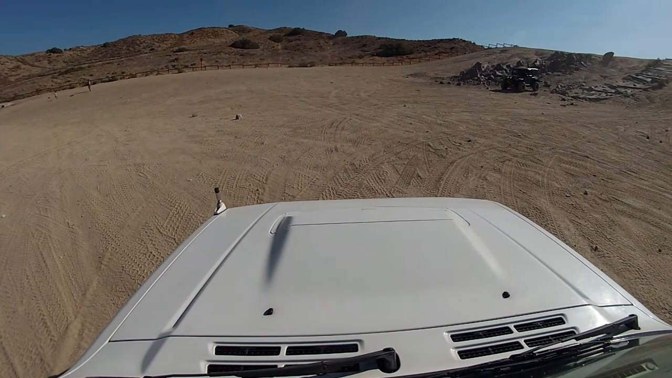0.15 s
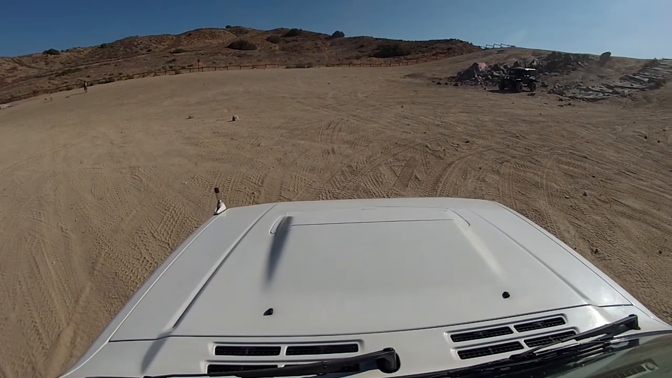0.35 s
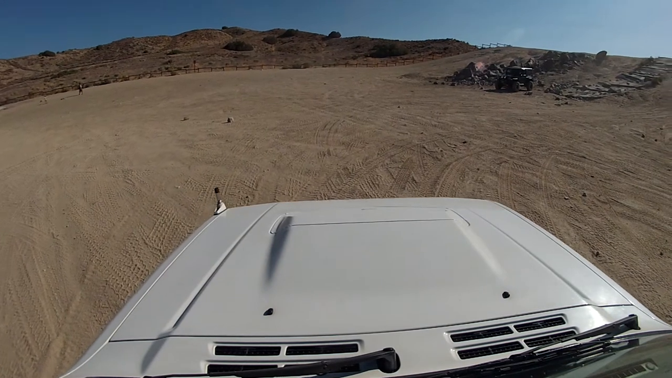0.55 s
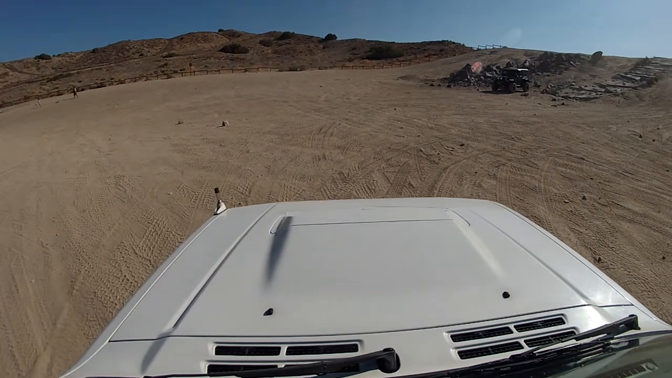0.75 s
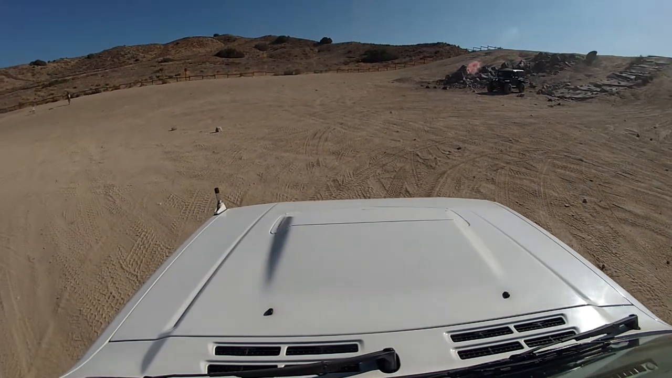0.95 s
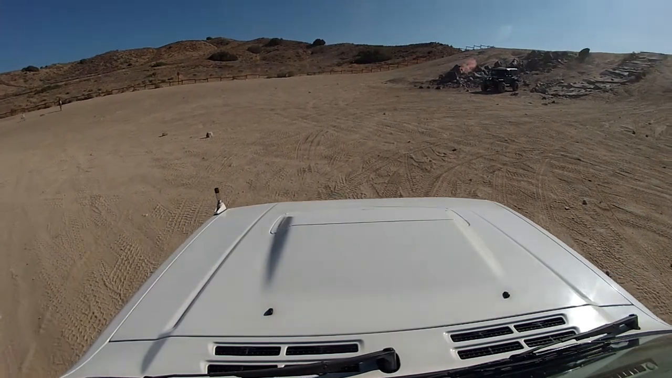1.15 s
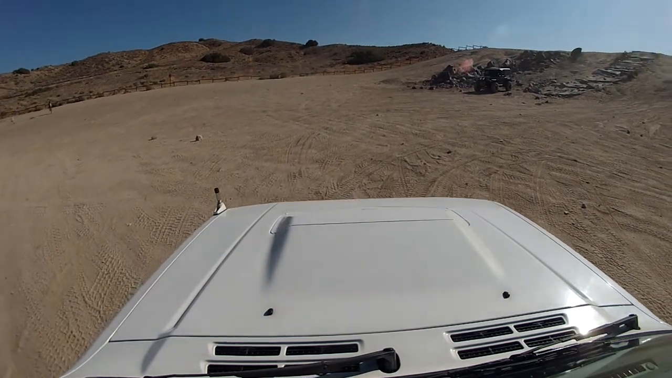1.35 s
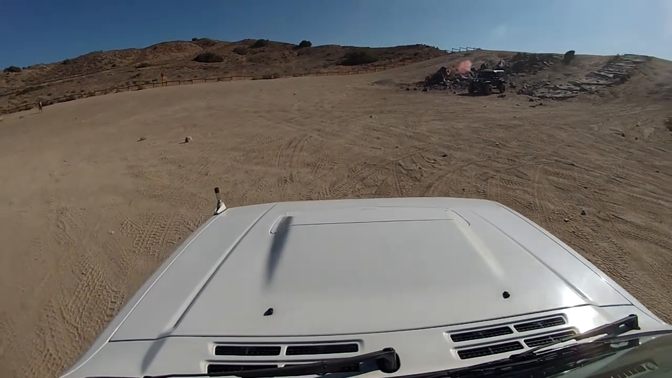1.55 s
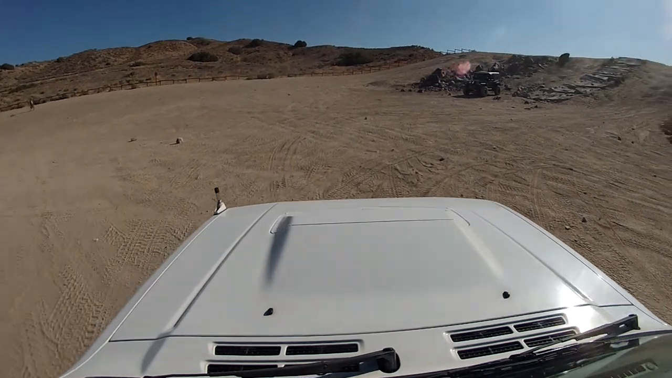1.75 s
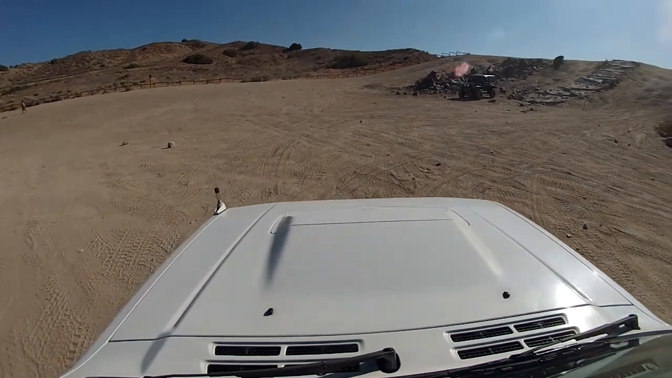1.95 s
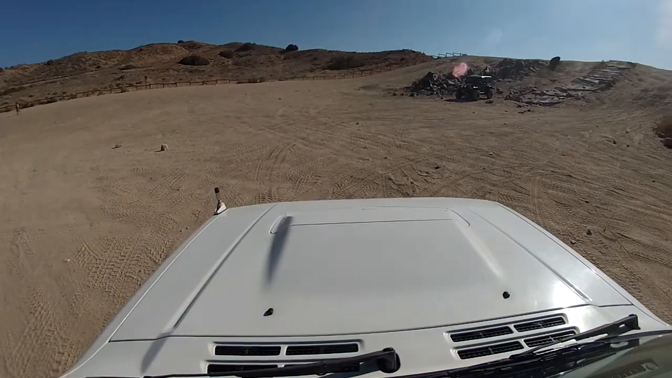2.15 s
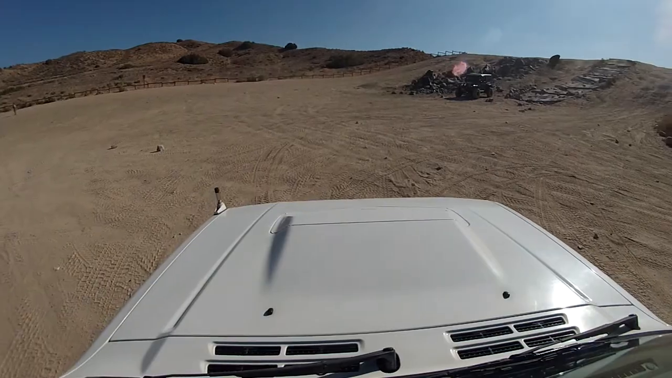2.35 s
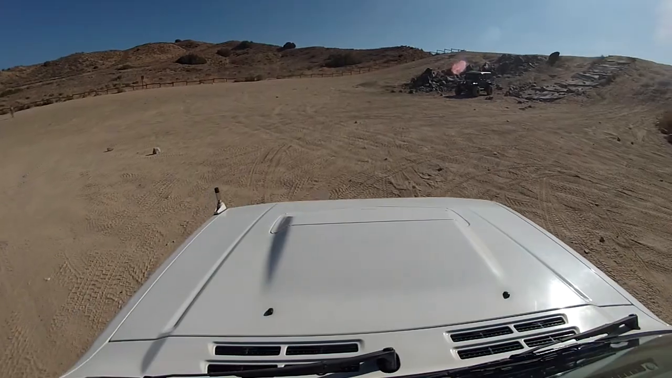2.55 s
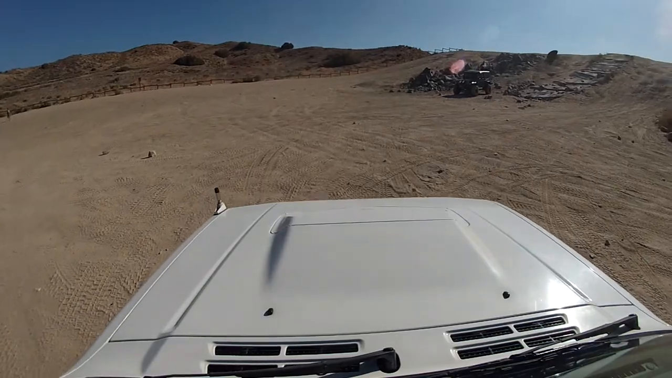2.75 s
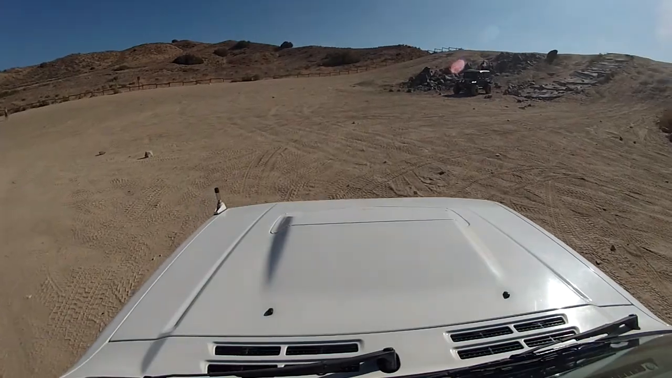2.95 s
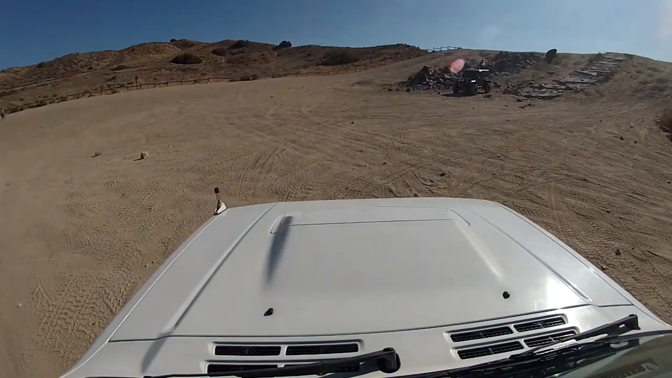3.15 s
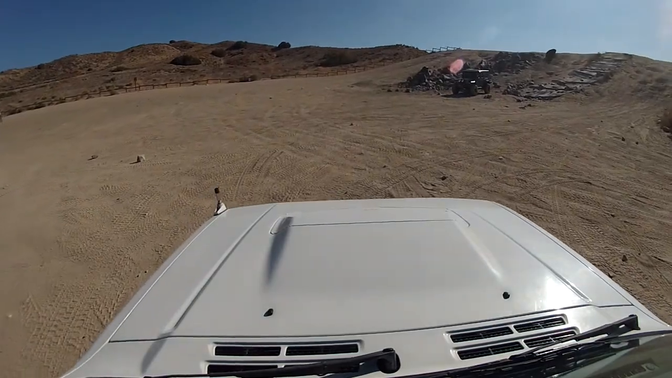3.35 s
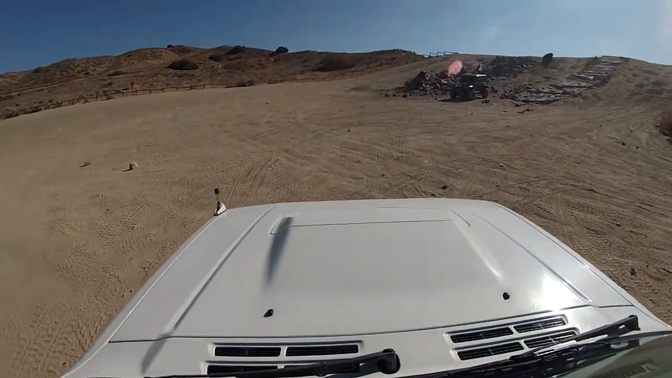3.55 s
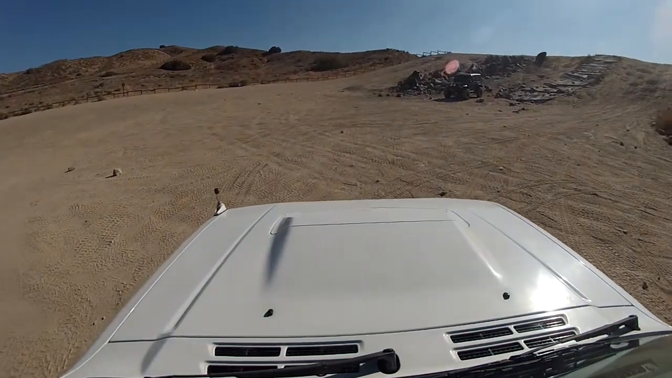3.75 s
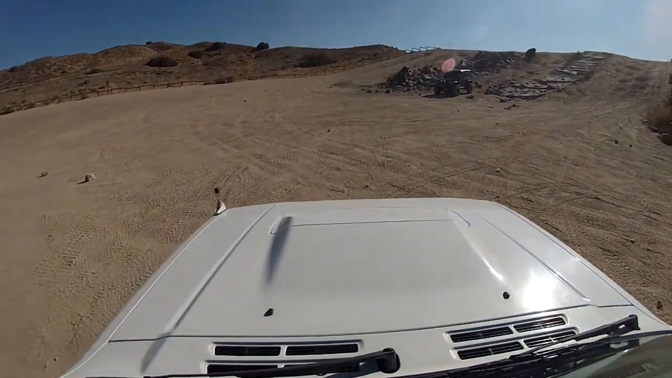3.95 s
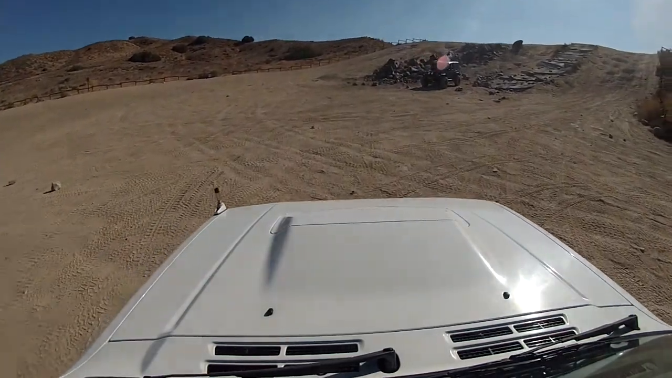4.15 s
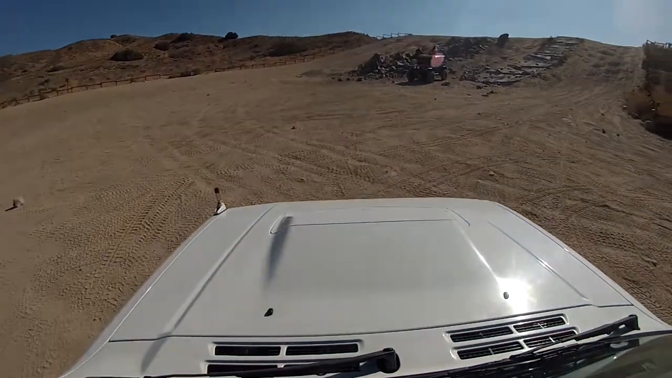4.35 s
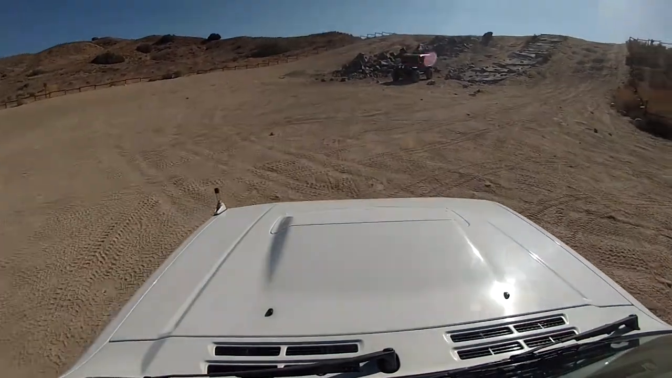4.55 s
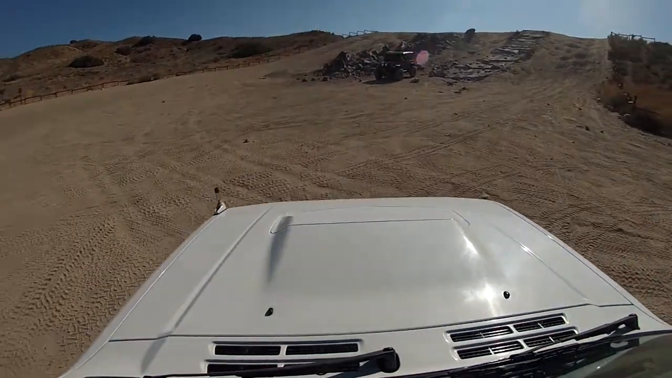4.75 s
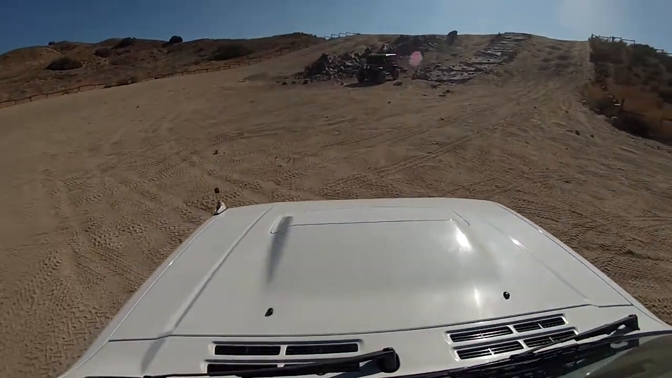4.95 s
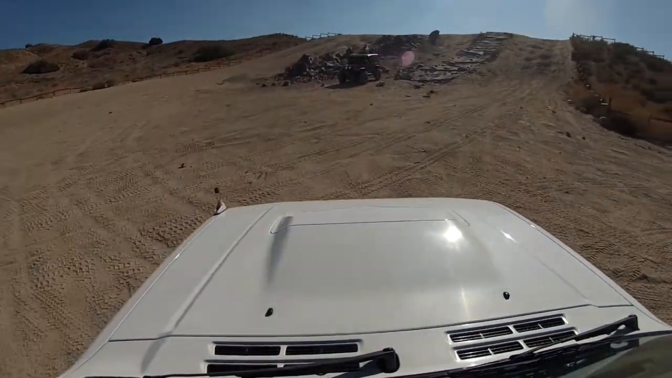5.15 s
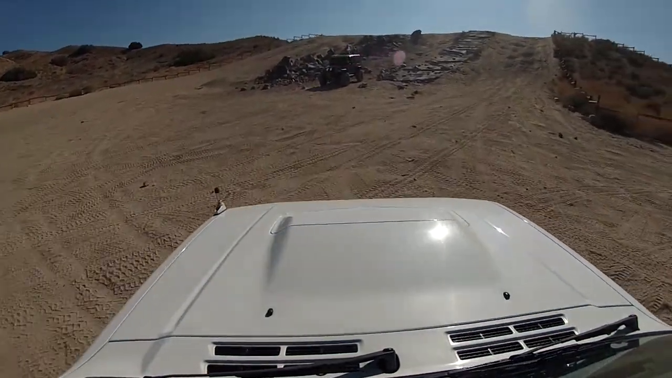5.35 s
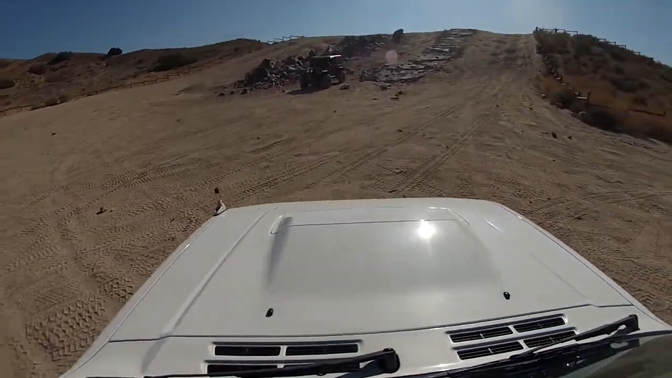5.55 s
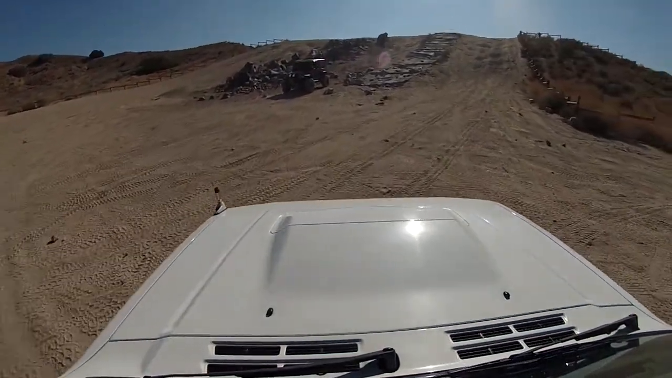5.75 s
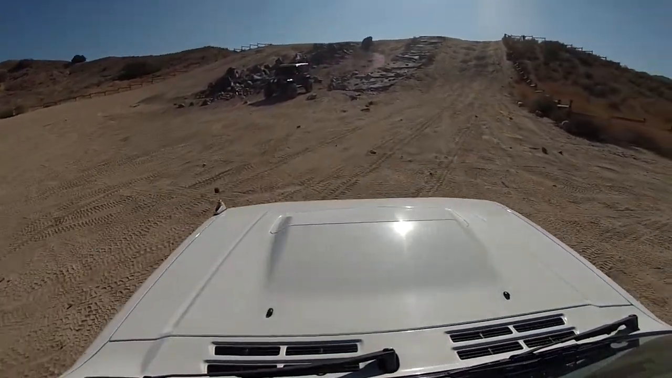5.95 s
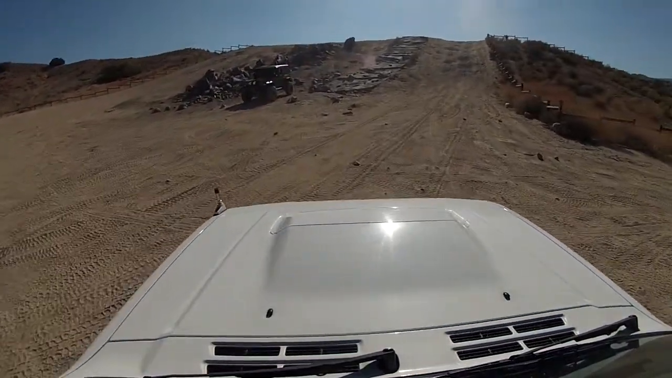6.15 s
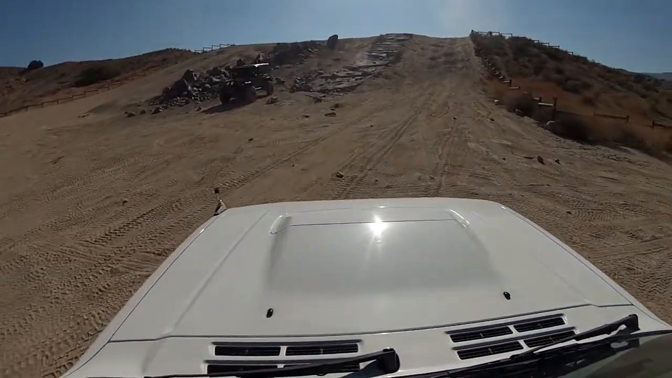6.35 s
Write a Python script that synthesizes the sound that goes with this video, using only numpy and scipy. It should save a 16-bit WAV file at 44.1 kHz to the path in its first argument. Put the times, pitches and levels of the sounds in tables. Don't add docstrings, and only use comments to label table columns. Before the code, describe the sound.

Heard from a muffled microphone in a housing on a truck's roof outdoors: a low engine throb over wind and tyre rumble, with a brief early rev and a faint trim squeak. It slows, lugs and shakes over bumps, then pulls hard up the sandy slope, revs climbing into a loud roar with fan whine, a grit tick and a thin belt squeal, then drops for a gear change.

```python
import sys
import numpy as np
from scipy import signal
from scipy.io import wavfile
from scipy.ndimage import uniform_filter1d

SR = 44100
rng = np.random.default_rng(int(sys.argv[2]) if len(sys.argv) > 2 else 0)


def nominal_scale(level):
    x = np.asarray(level, float) / 20
    return 10 ** x


def dump(signal):
    limited = np.clip(np.atleast_2d(signal).T, -1, 1)
    pcm = np.round(limited * 32767).astype(np.int16)
    wavfile.write(sys.argv[1], SR, pcm)


N = 282681

# time in seconds, shaft speed in Hz (turns per second).
SHAFT_SPEED = [(0, 16.5), (.55, 16.1), (.87, 23.1), (1.04, 22.5), (1.3, 20), (1.9, 19.2), (2.5, 16.6),
               (3.18, 14.8), (3.32, 24), (3.55, 32), (3.78, 42.3), (4.02, 44.6), (4.42, 54), (4.75, 58),
               (5.42, 62.4), (5.86, 62.5), (6.19, 44.6), (6.41, 44.6)]
# time in seconds, level of its second order in dB.
EFFORT_LEVEL = [(0, -49.5), (.3, -38), (.6, -43.5), (.9, -28), (1.1, -35.5), (1.4, -44), (2.0, -44),
                (2.75, -52), (3.12, -38.5), (3.27, -25.5), (3.57, -17.5), (3.85, -23.5), (4.4, -27.5),
                (5.25, -25.5), (5.55, -23), (5.87, -24.5), (6, -32), (6.26, -25)]
# time in seconds, timing scatter in radians.
LUGGING = [
    (0, .12),
    (1.8, .15),
    (2.2, .5),
    (2.5, .9),
    (3.1, .9),
    (3.3, .2),
    (6.41, .2),
]
# multiple of the shaft speed, level in dB.
EVEN_ORDER_LEVELS = [(4, 0), (8, -7.5)]
# multiple of the shaft speed, level in dB.
OTHER_ORDER_LEVELS = [(1, -5), (5, 0), (6, -2.5), (7, -12)]
# frequency in Hz, level in dB.
THIRD_ORDER = [(45, -6), (66, -9), (95, -7), (120, -5), (135, -4), (146, -3), (153, -17), (190, -18)]
# frequency in Hz, level in dB.
CAB_BOOM = [(15, -6), (65, 0), (97, -4), (132, 3), (140, 1), (151, -13), (190, -13), (222, -3), (270, -4),
            (320, -17)]
# frequency in Hz, level in dB.
FAN_TONE = [(70, -62), (150, -45), (190, -36), (206, -34), (222, -40), (265, -33), (284, -34), (293, -39)]
# frequency in Hz, level in dB.
FAN_OCTAVE = [(140, -64), (300, -54), (420, -50), (480, -39), (540, -37), (586, -32)]
# frequency in Hz, level in dB per Hz.
SHUT_THROTTLE = [(50, -24.5), (140, -18.5), (165, -17.5), (300, -18), (400, -23), (950, -27.5),
                 (1300, -37.5), (2300, -44.5), (3600, -48), (3850, -51.5), (5900, -53), (6300, -53.5),
                 (9000, -60.5), (15000, -81)]
# frequency in Hz, level in dB per Hz.
OPEN_THROTTLE = [(50, -6.5), (140, -10.5), (165, -9.5), (300, -18), (400, -13.5), (950, -20), (1300, -33.5),
                 (2300, -38.5), (3600, -42.5), (3850, -47.5), (5900, -57.5), (6300, -59.5), (9000, -64),
                 (15000, -75)]
# frequency in Hz, width in Hz, boost in dB.
HOUSING_CAVITIES = [(267, 81, 3), (534, 100, 3), (720, 11, 9), (910, 137, 3.5), (1796, 390, 5),
                    (2875, 270, 5), (3197, 76, 6), (3450, 157, 8), (5440, 330, 6.5), (5780, 200, 8.5),
                    (4430, 120, 4), (9700, 200, 5.5), (10700, 120, 5)]
# frequency in Hz, level in dB per Hz.
RUMBLE_COLOUR = [(5, -15.5), (16, 8), (35, 19), (60, 14), (100, 8.5), (140, -21), (200, -42)]
# time in seconds, level in dB, frequency in Hz, length in cycles.
SPRING_JOLTS = [(.08, -31, 28, 1.5), (1.845, -23, 26, 1.2), (2.16, -22, 38, .9), (2.4, -31, 32, 1.2),
                (2.76, -29, 28, 1.5), (2.68, -30, 125, 3.5), (2.8, -28, 90, 2.5), (3.19, -29, 125, 3.5),
                (.77, -35, 205, 9), (4.29, -27, 30, 1.5), (6.25, -27, 30, 2.5), (5.15, -26, 58, 5.5),
                (5.27, -27, 80, 6.5), (5.7, -26, 55, 3.5)]
# start in seconds, length in seconds, pitch in Hz, sag in Hz per second, level in dB.
SQUEAL_EVENTS = [
    (3.9, .09, 8870, 300, -73),
    (3.985, .29, 8858, -40, -57),
    (4.28, .035, 8825, 600, -68),
    (4.32, .06, 8800, 1200, -72),
    (.35, .17, 1580, 900, -61),
]
# time in seconds, click level in dB, ring level in dB.
GRIT_TICKS = [
    (3.58, -50, -37),
    (3.591, -36, -44),
    (.62, -74, -61),
    (1, -72, -60),
    (1.06, -72, -61),
    (1.27, -74, -55),
    (3.334, -66, -54),
]

IDLE_HZ, LIGHT_DB = 16, -42


def evened(x):
    return x / np.sqrt(np.mean(x ** 2) + 1e-20)


def read(points, hz):
    f, value = np.transpose(points)
    return np.interp(np.log(hz + 1), np.log(f + 1), value)


def follow(rows, t):
    s, value = np.transpose(rows)
    return np.interp(t, s, value)


def drift(seconds):
    size = max(round(seconds * SR), 1)
    once = uniform_filter1d(rng.standard_normal(N), size)
    return evened(uniform_filter1d(once, size))


def noise(field_db, size, patchy_db):
    hop = size // 4
    hz = np.fft.rfftfreq(size, 1 / SR)
    t = np.arange(N // hop + 5) * hop / SR
    a, b, patches = rng.standard_normal((len(t), len(hz), 3)).T
    patches = uniform_filter1d(patches, size=8, axis=0)
    patches = evened(uniform_filter1d(patches, size=10, axis=1))
    spectra = (a + 1j * b) * nominal_scale(field_db(hz, t) + patchy_db * patches)
    return signal.istft(spectra, nperseg=size, noverlap=size - hop)[1][:N]


def controls(t):
    shaft = follow(SHAFT_SPEED, t)
    return shaft, np.log2(shaft / IDLE_HZ), follow(EFFORT_LEVEL, t) - LIGHT_DB


def surge(t):
    gain = (follow(SHAFT_SPEED, t + .05) - follow(SHAFT_SPEED, t - .05)) / .1
    return np.clip(gain / 25, 0, 1)


def engine():
    t = np.arange(N) / SR
    shaft, _, effort_db = controls(t)
    shaft = uniform_filter1d(shaft, size=4000)
    turn = 2 * np.pi * np.cumsum(shaft) / SR
    scatter = follow(LUGGING, t)
    second_db = LIGHT_DB + effort_db
    surge_db = 3.5 * surge(t)
    overrun = np.pi * np.clip(.5 - (effort_db - 4) / 6, 0, 1)

    out = nominal_scale(second_db + 1.0 * drift(.02)) * np.cos(2 * turn)
    third_db = second_db + read(THIRD_ORDER, 3 * shaft) + 1.3 * drift(.03)
    out += nominal_scale(third_db) * np.cos(3 * turn + scatter * drift(.04))

    even_db = -40 + .06 * effort_db
    other_db = -39.5 + .2 * effort_db
    for group_db, orders in ((even_db, EVEN_ORDER_LEVELS), (other_db, OTHER_ORDER_LEVELS)):
        for k, db in orders:
            waver = nominal_scale(1.2 * drift(.06))
            slip = scatter * drift(.04)
            level_db = group_db + surge_db + db + read(CAB_BOOM, k * shaft)
            out += nominal_scale(level_db) * waver * np.cos(k * (turn + np.pi) + overrun + slip)
    return np.sqrt(2) * out, turn, shaft


def fan(turn, shaft):
    order = 4.69
    frees_s, fade_s, drop_db = 5.95, .12, -13
    freed_db = drop_db * np.clip((np.arange(N) / SR - frees_s) / fade_s, 0, 1)
    out = np.zeros(N)
    for k, curve in ((1, FAN_TONE), (2, FAN_OCTAVE)):
        level_db = read(curve, k * order * shaft) + freed_db + .8 * drift(.04)
        out += nominal_scale(level_db) * np.cos(k * order * turn + .15 * drift(.04))
    return np.sqrt(2) * out


def roar(turn):
    def field_db(hz, t):
        _, octaves, effort_db = controls(t)
        lugging = follow(LUGGING, t)
        level_db = -46.5 + 10 * octaves + 0.023 * effort_db + 1 * lugging
        throttle = np.clip((level_db - level_db.min()) / np.ptp(level_db), 0, 1)
        db = np.outer(read(SHUT_THROTTLE, hz), 1 - throttle)
        db += np.outer(read(OPEN_THROTTLE, hz), throttle)
        for f, width, boost in HOUSING_CAVITIES:
            db += (boost / (1 + (2 * (hz - f) / width) ** 2))[:, None]
        gulp_hz, gulp_width_hz, gulp_db = 242, 93, 3.5
        gulp_shape = 1 / (1 + (2 * (hz - gulp_hz) / gulp_width_hz) ** 4)
        gulp = gulp_db * np.outer(gulp_shape, surge(t) + 0.91 * lugging)
        middle = (hz > 300) & (hz < 2500)
        middle_db = 10 * np.log10(np.sum(nominal_scale(db[middle]) ** 2, axis=0))
        return db - middle_db + level_db + gulp

    throb = 1 + .09 * np.cos(2 * turn + .8 * drift(.04))
    return noise(field_db, size=2048, patchy_db=.8) * throb


def rumble():
    def field_db(hz, t):
        level_db = -47 + 1.5 * controls(t)[1] + 6 * follow(LUGGING, t)
        return read(RUMBLE_COLOUR, hz)[:, None] + level_db - 16

    return noise(field_db, size=4096, patchy_db=1.7) * nominal_scale(0.61 * drift(0.09))


def jolts():
    t, out = np.arange(N) / SR, np.zeros(N)
    for s, db, hz, cycles in SPRING_JOLTS:
        swell = np.exp(-(2 * (t - s) * hz / cycles) ** 2)
        out -= nominal_scale(db) * swell * np.cos(2 * np.pi * hz * (t - s))
    return out


def squeals():
    edge_s, loudest_at, swell_db = .02, .68, 20
    t, out = np.arange(N) / SR, np.zeros(N)
    for s, length, hz, sag, db in SQUEAL_EVENTS:
        u = np.clip(t - s, 0, length)
        edge = np.clip(np.minimum(u, length - u) / edge_s, 0, 1)
        level_db = db - swell_db * abs(u / length - loudest_at) + 1.7 * drift(.012)
        out += edge * nominal_scale(level_db) * np.sin(2 * np.pi * (hz * u - sag * u ** 2 / 2))
    return np.sqrt(2) * out


def ticks():
    out, t = np.zeros(N), np.arange(1300) / SR
    wall = signal.butter(2, [900, 2600], "band", fs=SR)
    for s, click_db, ring_db in GRIT_TICKS:
        ring = evened(signal.lfilter(*wall, rng.standard_normal(len(t))))
        ring = ring * np.exp(-t / .009)
        out[round(s * SR):][:len(t)] += nominal_scale(click_db) * (t == 0) + nominal_scale(ring_db) * ring
    return out


def scene():
    tones, turn, shaft = engine()
    mix = tones + fan(turn, shaft) + roar(turn) + rumble()
    mix = mix + jolts() + squeals() + ticks()
    return mix[None]


def top_cut(x):
    return signal.sosfilt(signal.butter(12, 15570, fs=SR, output="sos"), x)


def record(dry):
    hissy = dry + nominal_scale(-91) * rng.standard_normal(dry.shape)
    lowpass = signal.firwin(511, 15250, window=("kaiser", 9), fs=SR)
    limited = signal.oaconvolve(hissy, lowpass[None], "same")
    return top_cut(limited)


dry = scene()
out = record(dry)
dump(out)
```